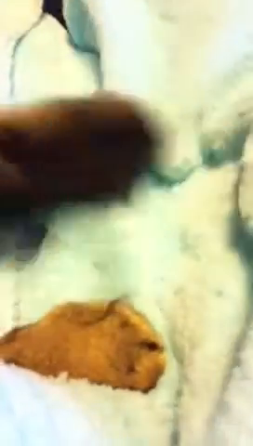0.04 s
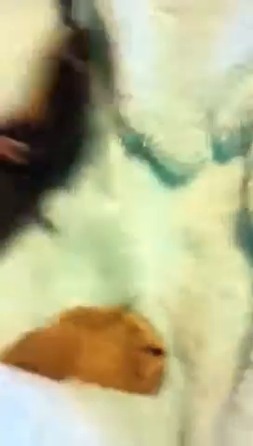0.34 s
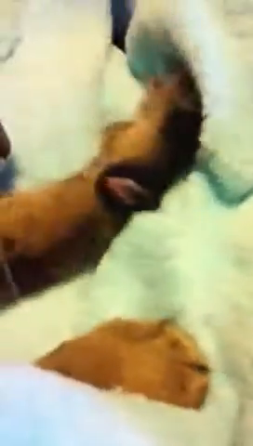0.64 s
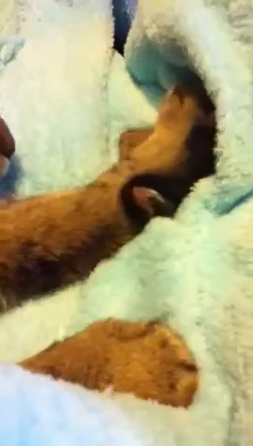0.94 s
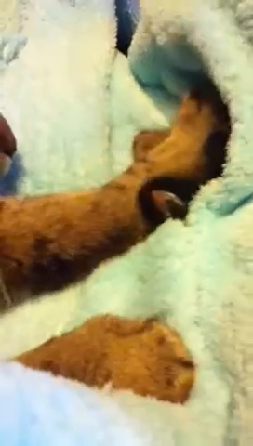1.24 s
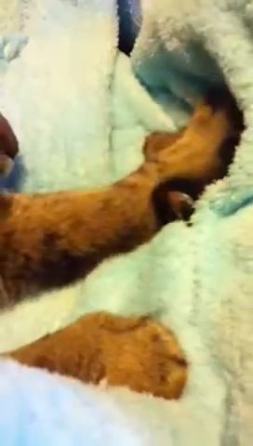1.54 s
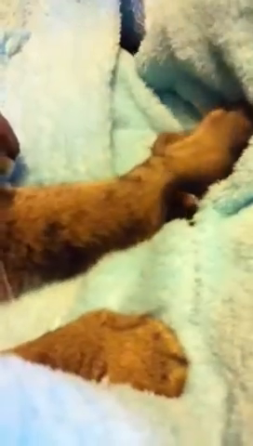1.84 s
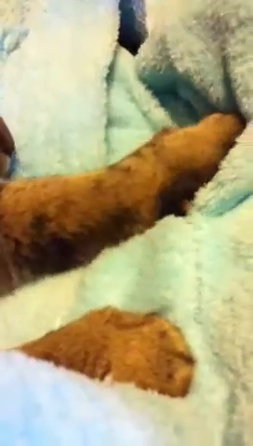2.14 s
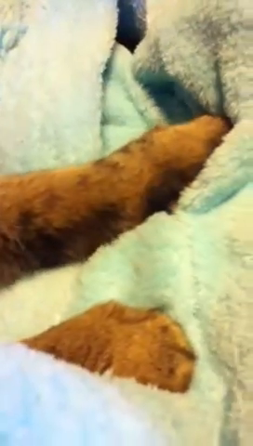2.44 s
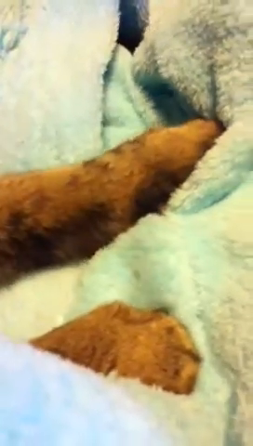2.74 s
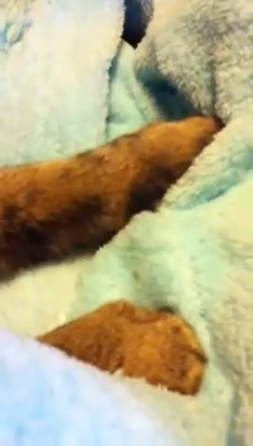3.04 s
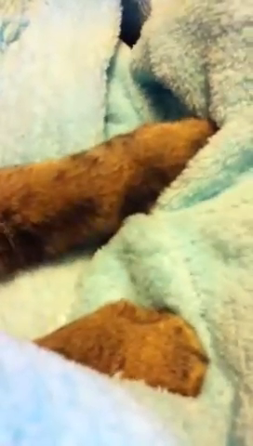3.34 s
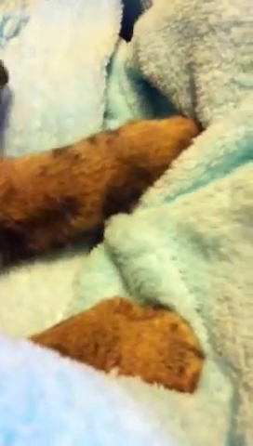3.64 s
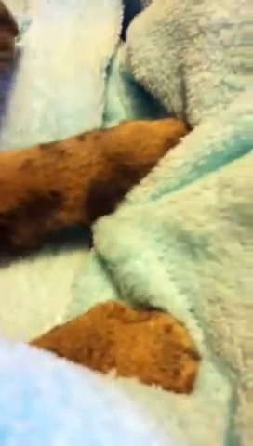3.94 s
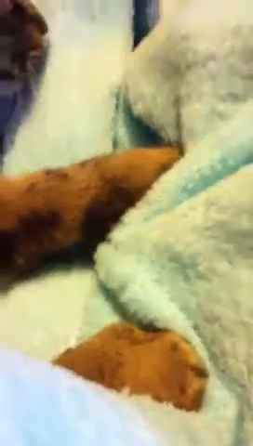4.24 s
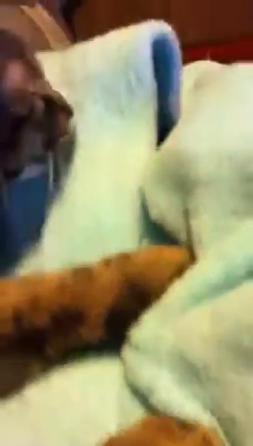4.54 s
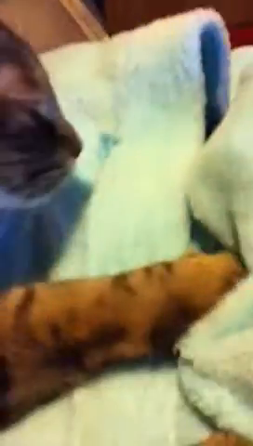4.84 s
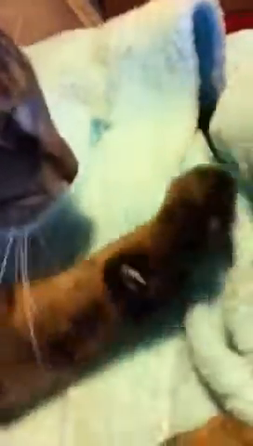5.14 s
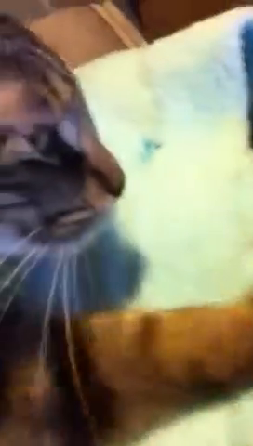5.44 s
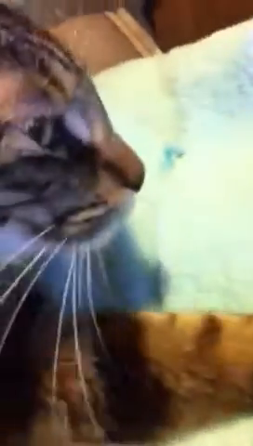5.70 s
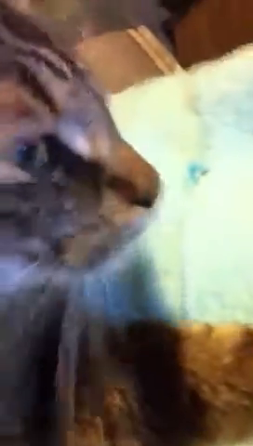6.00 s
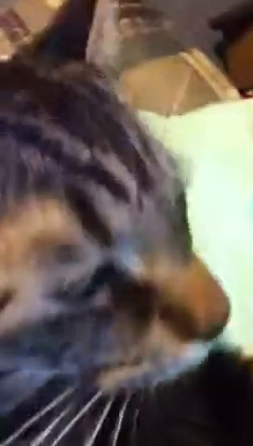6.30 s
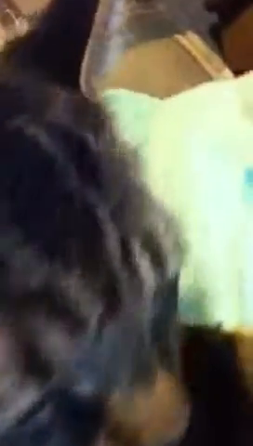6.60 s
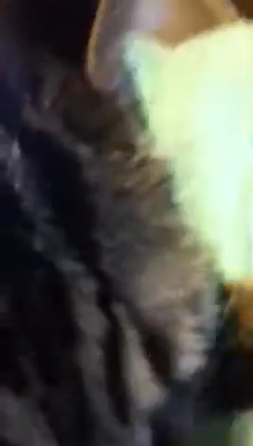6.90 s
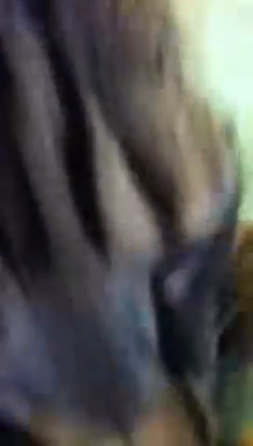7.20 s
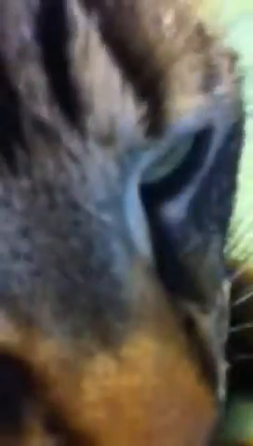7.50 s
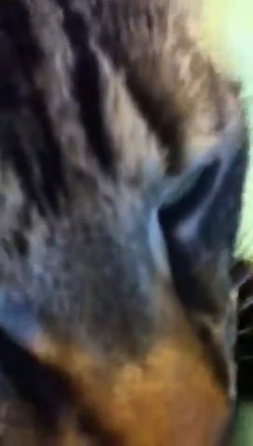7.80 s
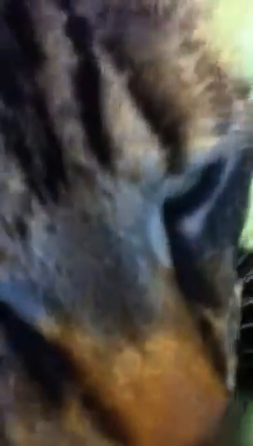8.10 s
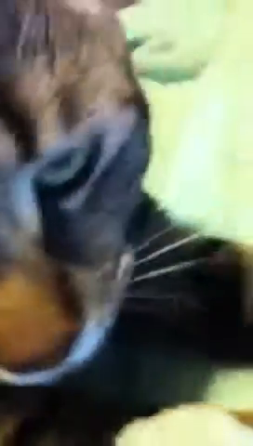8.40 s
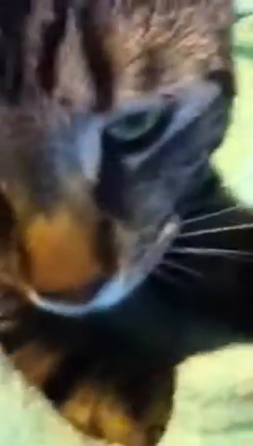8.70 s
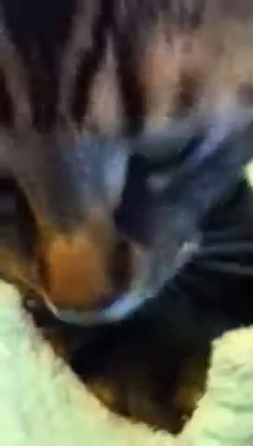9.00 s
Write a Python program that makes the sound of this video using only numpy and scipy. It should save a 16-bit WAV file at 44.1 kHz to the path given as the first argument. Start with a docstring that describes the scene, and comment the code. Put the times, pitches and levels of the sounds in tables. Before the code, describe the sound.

Indoors, a cat's close purr runs throughout in alternating outward and inward strokes, over a faint room hum and hiss. A short distant slide comes first, then tiny dry clicks, soft swishes of a fleece blanket, a gentle thump and faint squeaks. Later the purr grows deeper near the microphone while a cluster of wooden knocks, one loud, sounds further away. Two close clicks follow as the purring carries on.

```python
"""A cat kneads a fleece blanket close to the microphone, purring throughout: its larynx beats about 26
times a second, in outward strokes and inward ones that are sharper, lighter in the bass and rasp in the
nose. Early on, something slides across the room; then come fleece brushes, small clicks, a soft thump
close by near 5 s and faint squeaks. From 6 s the cat's head nears the microphone and the throb deepens;
furniture is bumped further off, loudly near 7 s. Two last clicks sound over the steady hum and hiss."""
import sys
import numpy as np
from scipy import signal
from scipy.fft import rfft, irfft, next_fast_len
from scipy.io import wavfile
from scipy.ndimage import uniform_filter1d

SR = 44100
rng = np.random.default_rng(int(sys.argv[2]) if len(sys.argv) > 2 else 0)


def transcribe(signal):
    """Save signal, clipped to [-1, 1], as a 16-bit WAV file at the path in sys.argv[1]."""
    frames = np.atleast_2d(signal).T
    limited = np.clip(frames, -1, 1)
    pcm = np.round(limited * 32767).astype(np.int16)
    wavfile.write(sys.argv[1], SR, pcm)


N = 403515


# The purr, close up, outward and inward in turn. Each row: first and last beat in seconds, relative level
# at mid-stroke in dB, swell across the stroke in dB, relative nose rasp in dB.
PURR_STROKES = [(.014, .611, -41.5, -5.5, -21), (.766, 1.259, -44, 1.5, -16),
                (1.342, 2.230, -43.5, -1.5, -40), (2.306, 2.535, -45, -2, -32),
                (2.572, 2.811, -44.5, -4, -36), (2.850, 3.076, -47, 4, -28), (3.113, 3.427, -45.5, -3, -32),
                (3.505, 3.614, -44, 4, -22), (3.686, 3.885, -40, 7, -34), (3.923, 4.037, -49, -8, -28),
                (4.076, 4.235, -38, -8, -24), (4.272, 4.420, -40.5, -1, -15.5),
                (4.459, 4.619, -44.5, -2, -23), (4.695, 4.992, -42.5, 4, -18.5),
                (5.033, 5.150, -45, 8, -28), (5.209, 5.245, -36.5, -7.5, -20), (5.271, 5.467, -45, -9, -30),
                (5.544, 5.881, -44.5, -10, -13), (5.921, 6.784, -44.5, 0.5, -22),
                (6.860, 7.276, -40, -2.5, -10.5), (7.323, 7.999, -40, -9, -23),
                (8.073, 8.488, -40, 1.5, -9), (8.569, 9.120, -41.5, 3.5, -17.5)]
# One beat through throat and chest, each way. Each row: frequency in Hz, relative level in dB.
OUTWARD_BODY = [(25, -45), (45, -16.5), (75, -6), (120, 5), (175, 5), (260, -5), (380, -2.5), (450, -14),
                (560, -26), (850, -25.5), (1400, -33.5), (4000, -55)]
INWARD_BODY = [(25, -54), (45, -32), (75, -9.5), (120, -3.5), (180, 5.5), (280, -6), (390, -1.5), (460, -9),
               (560, -21), (950, -18.5), (1500, -39.5), (4000, -54)]
# The head coming up to the microphone. Each row: time in seconds, nearness from 0 to 1.
HEAD_NEARNESS = [(6.0, 0.13), (7.4, 1)]

def cat(throb_db=-1.0, throb_hz=85):
    """Outward strokes beat in double kicks, inward ones are sharper; close up, the deepest throb swells."""
    outward = purr(PURR_STROKES[0::2], OUTWARD_BODY, rate_hz=25.1, voice_db=-2.0, flutter_db=-17,
                   lead_s=.0021, opening=.34, open_s=.002, rebound=.16, rebound_s=.017, rasp_s=.0062)
    inward = purr(PURR_STROKES[1::2], INWARD_BODY, rate_hz=26.6, voice_db=-2.3, flutter_db=-12,
                  lead_s=.0011, opening=.12, open_s=.00295, rebound=.28, rebound_s=.0145, rasp_s=.0042)
    voice = outward + inward
    nearness = np.interp(np.arange(N) / SR, *np.transpose(HEAD_NEARNESS))
    throb = filtered(voice, lambda hz: 1 / (1 + (hz / throb_hz) ** 4))
    return voice + amp(throb_db) * nearness * throb


# Air rasping in the nose, close up. Each row: frequency in Hz, relative level in dB.
NOSE_RASP = [(300, -28), (600, 9), (1000, 9), (1700, -4.5), (2500, -1.5), (3000, -8.5), (4000, -7),
             (4700, 0), (5600, -6), (6800, -2.5), (10000, -11), (15000, -31)]

def purr(strokes, body, rate_hz, voice_db, flutter_db, lead_s, opening, open_s, rebound, rebound_s, rasp_s):
    """Each beat is a soft opening, a sharp closure and a weak rebound, with a puff of turbulent air."""
    times, sizes, rasp = larynx_beats(strokes, rate_hz)
    closure = times - lead_s
    scatter = rng.standard_normal((len(times), 4)) * [.1, 1.2, .0006, 1.5]
    stretch, opening_db, late_s, rebound_db = scatter.T
    throat = ringing(body)
    voice = kicks(closure, sizes, throat)
    voice += kicks(closure - open_s * (1 + stretch), opening * sizes * amp(opening_db), throat)
    voice += kicks(closure + rebound_s + late_s, rebound * sizes * amp(rebound_db), throat)
    t = np.arange(SR // 10) / SR
    puff = np.exp(-t / .02) * (1 - np.exp(-t / .00066))
    flutter = kicks(closure, sizes, puff) * noise(body)
    # air ticks through the nose in a short jet at each closure
    jet = kicks(closure, sizes * rasp, np.exp(-t / rasp_s)) * noise(NOSE_RASP)
    return amp(voice_db) * voice + amp(flutter_db) * flutter + amp(6.5) * jet


def larynx_beats(strokes, rate_hz, jitter_s=.0003, scatter_db=1.0):
    """Time, size and rasp of every beat: a stroke gathers strength, swells or sags, and runs out of air."""
    runs = []
    for first, last, db, swell_db, rasp_db in strokes:
        t = np.linspace(first, last, round((last - first) * rate_hz) + 1)
        place = np.linspace(-.5, .5, len(t))
        attack_db = -7.5 * np.exp((first - t) / .031)
        release_db = -6.5 * np.exp((t - last) / .017)
        arch_db = 4 * (np.cos(np.pi * place) - 1)  # most rasp in mid-stroke, where the air is fastest
        runs.append([t, db + swell_db * place + attack_db + release_db, rasp_db + arch_db])
    times, effort_db, nose_db = np.concatenate(runs, axis=1)
    louder, later = rng.standard_normal((len(times), 2)).T
    return times + jitter_s * later, amp(effort_db + scatter_db * louder), amp(nose_db)


# A soft thump close by near 5 s, then bumps further off in the room. Each row: start in seconds, relative
# level in dB, rise in seconds, relative thud level in dB, treble corner of the clatter in Hz.
BUMP_HITS = [(4.966, -57.5, 0.0039, 5.5, 1200), (6.431, -57, 0.015, 3, 700), (6.525, -50, 0.011, -4, 5000),
             (6.594, -41, 0.0081, -8.5, 4200), (6.951, -21, 0.014, -15.5, 14000),
             (7.166, -30.5, 0.089, -4.5, 5200), (7.603, -38.5, 0.024, 5.5, 2500),
             (7.836, -60.5, 0.03, 13, 600)]
# The ringing wood. Each row: frequency in Hz, relative level in dB, seconds to fall by 60 dB.
WOOD_MODES = [(188, 5, 0.37), (241, 3.5, 0.24), (351.5, -6, 0.23), (395, -8, 0.34), (504, 3, 0.29),
              (581, -10, 0.4), (738, -11.5, 0.45), (856, -6.5, 0.36), (970, -8, 0.27), (1128, -5, 0.33),
              (1274, 0.5, 0.17), (1372, -8.5, 0.38), (1655, -9, 0.37), (1850, -11, .27)]
# A bump's low thud and bright knock. Each row: frequency in Hz, relative level in dB.
THUD_SPECTRUM = [(30, -38), (70, -2.5), (120, -3), (190, 4.5), (270, -16.5), (340, 5.5), (420, 1),
                 (480, -14.5), (580, -10.5), (900, -20.5), (3000, -43)]
KNOCK_SPECTRUM = [(70, -26), (150, -13), (230, 13.5), (350, 7), (530, -2), (650, -6), (1000, -1),
                  (1300, -1), (1800, -4.5), (2500, -9.5), (4000, -10), (7000, -13), (11000, -14),
                  (15500, -30)]

def bumps():
    """A soft thump, then knocks on wooden furniture: the thud comes first, the clatter builds after it."""
    out, t = np.zeros(N + SR), np.arange(SR) / SR
    for start, db, rise, thud_db, corner_hz in BUMP_HITS:
        chance = rng.standard_normal((len(WOOD_MODES), 2))
        ring = sum(amp(level + 2 * louder - 60 * t / t60) * np.sin(2 * np.pi * (hz * t + phase))
                   for (hz, level, t60), (louder, phase) in zip(WOOD_MODES, chance))
        thud = amp(thud_db + 3) * room_decay(noise(THUD_SPECTRUM, SR)) * (1 - np.exp(-t / (.5 * rise)))
        knock = room_decay(noise(KNOCK_SPECTRUM, SR))
        clatter = (amp(-1) * knock + amp(-9.5) * ring) * (1 - np.exp(-(t / rise) ** 2))
        # a softer contact loses its top
        clatter = filtered(
            clatter, lambda hz: 1 / (1 + 1j * hz / corner_hz * np.sqrt(2) - (hz / corner_hz) ** 2))
        out[round(start * SR):][:SR] += amp(db + 3.5) * (thud + clatter)
    return out[:N]


# A slide, well away from the microphone. Each row: frequency in Hz, relative level in dB.
SCUFF_SPECTRUM = [(120, -11), (260, -1.5), (600, 2), (950, -3), (1700, 2), (2800, -5.5), (4200, -9.5),
                  (8000, -20.5), (14000, -33.5)]

def scuff(start_s=.823, rise_s=.038, swell_s=.034):
    """Something slides briefly across the room and the walls carry it on."""
    t = np.arange(SR) / SR
    onset = (1 - np.exp(-t / rise_s)) * (1 + np.minimum(t / swell_s, 1))
    slide = room_decay(noise(SCUFF_SPECTRUM, SR)) * onset
    return amp(-36.5) * np.pad(slide, (round(start_s * SR), N))[:N]


# Paws and muzzle on the fleece, near the microphone. Each row: centre and half length in seconds,
# level in dB, strongest frequency in Hz.
FLEECE_BRUSHES = [(0.573, 0.055, -57.5, 2690), (2.0, .03, -62, 2600), (2.74, 0.021, -62, 2800),
                  (4.423, 0.082, -58.5, 2200), (5.54, 0.098, -60.5, 1470), (6.077, 0.18, -64.5, 1900),
                  (7.204, 0.07, -57.5, 6000), (8.293, 0.2, -59.5, 1620), (8.69, 0.081, -58, 2600)]
# Soft pushes against the bedding; the row at 6.995 s is the deep low end of the loud bump near 7 s. Each row:
# centre in seconds, level in dB.
BEDDING_PUSHES = [(2.72, -52), (4.98, -50), (6.49, -54), (6.64, -51), (6.995, -57), (7.65, -44)]

def blanket(band_q=.94, push_s=.028):
    """The fleece swishes under the paws and gives dull pushes when weight shifts; one more dull push deepens
    the loud bump near 7 s."""
    t = np.arange(N) / SR
    fibres = amp(1.1 * unit(uniform_filter1d(rng.standard_normal(N), size=90)))
    swish = np.zeros(N)
    for centre, half, db, peak_hz in FLEECE_BRUSHES:
        friction = fibres * rng.standard_normal(N)
        rub = filtered(friction, lambda hz: hz / (hz + 1j * band_q * (hz * hz / peak_hz - peak_hz)))
        swish += amp(db) * np.exp(-((t - centre) / half) ** 2) * unit(rub)
    weight = sum(amp(db) * np.exp(-((t - centre) / push_s) ** 2) for centre, db in BEDDING_PUSHES)
    rumble = noise([(15, -10), (35, -10), (65, 8), (110, 3), (300, -36), (1000, -70)])
    return swish + weight * rumble


# Clicks right by the microphone. Each row: start in seconds, peak level in dB.
NEAR_CLICKS = [(1.56, -35), (4.982, -34), (5.207, -41), (8.644, -36), (8.705, -26.5)]

def clicks():
    """Tiny dry contacts, each ringing with the same short tick."""
    tick = ringing([(60, 3), (300, -12), (900, 8.5), (2200, -3), (3900, -11), (4650, .5), (5400, -11),
                    (7000, -6), (10000, -21), (15000, -23)])
    times, db = np.transpose(NEAR_CLICKS)
    return kicks(times, amp(db), tick / np.abs(tick).max())


# Faint squeaks as the cat shifts. Each row: centre and half length in seconds, relative level in dB,
# pitch in Hz, glide in Hz a second.
RUB_SQUEAKS = [(5.35, .025, -60, 3750, 496), (5.468, .016, -58, 1016, 4000)]

def squeaks(width_hz=260):
    """Short, thin rubbing tones: narrow noise around a gliding pitch."""
    t = np.arange(N) / SR
    grain = unit(filtered(rng.standard_normal(N), lambda hz: np.exp(-(hz / width_hz) ** 2)))
    tones = np.zeros(N)
    for centre, half, db, hz, glide in RUB_SQUEAKS:
        phase = 2 * np.pi * np.cumsum(hz + glide * (t - centre)) / SR
        tones += amp(db) * np.exp(-((t - centre) / half) ** 2) * np.sin(phase)
    return grain * tones


# The room's echo. Each row: frequency in Hz, seconds to fall by 60 dB.
ROOM_T60 = [(100, 0.51), (200, 0.49), (400, 0.34), (560, 0.42), (1500, 0.39), (5000, 0.28), (12000, 0.2)]

def room_decay(x):
    """Each frequency dies away as it does in the room, the treble soonest."""
    hz, t, spectra = signal.stft(x, SR, nperseg=256)
    fade = amp(-60 * t / along(ROOM_T60, hz)[:, None])
    return signal.istft(spectra * fade, SR, nperseg=256)[1][:len(x)]


# The quiet room at the microphone. Each row: frequency in Hz, relative level in dB.
ROOM_TONE = [(15, -55), (25, -19.5), (59, -10), (119, -3), (178, 0), (246, -9), (389, -10.5), (632, -19),
             (1030, -17.5), (1460, -22.5), (2490, -25), (8380, -27.5), (11900, -29.5), (15600, -33.5)]

def room_tone():
    """Steady room hum and microphone hiss."""
    return amp(-53.5) * noise(ROOM_TONE)


def amp(db):
    """Decibels to gain."""
    return 10 ** (np.asarray(db) / 20)


def unit(x):
    """Scale to rms 1."""
    return x / np.sqrt(np.mean(x ** 2) + 1e-20)


def along(points, hz):
    """Read (Hz, value) points on a log frequency axis."""
    point_hz, values = np.transpose(points)
    return np.interp(np.log(hz + 1), np.log(point_hz + 1), values)


def filtered(x, response):
    """Filter x by a gain given as a function of Hz."""
    size = next_fast_len(len(x) + SR // 2)
    return irfft(rfft(x, size) * response(np.fft.rfftfreq(size, 1 / SR)), size)[:len(x)]


def noise(spectrum, size=N):
    """Noise of rms 1, coloured by (Hz, dB) points."""
    return unit(filtered(rng.standard_normal(size), lambda hz: amp(along(spectrum, hz))))


def ringing(spectrum, size=8192):
    """A body's answer to one kick, from (Hz, dB) points, with the energy of 10 ms at rms 1."""
    cepstrum = irfft(np.log(amp(along(spectrum, np.fft.rfftfreq(size, 1 / SR)))))
    # minimum phase: nothing sounds before the kick
    cepstrum[1:size // 2] *= 2
    cepstrum[size // 2 + 1:] = 0
    answer = irfft(np.exp(rfft(cepstrum)))[:size // 2]
    return answer * np.sqrt(SR / 100) / np.linalg.norm(answer)


def kicks(times, sizes, answer):
    """A scaled copy of the answer at each time."""
    at = np.clip(np.round(times * SR).astype(int), 0, N)
    return signal.fftconvolve(np.bincount(at, sizes, N + 1), answer)[:N]


def scene():
    """One microphone by the blanket: the cat in front, the room behind."""
    return (cat() + bumps() + scuff() + blanket() + squeaks() + clicks() + room_tone())[None]


def record(dry):
    """The recorder keeps nothing above 15750 Hz."""
    return np.array([filtered(channel, lambda hz: hz < 15750) for channel in dry])


dry = scene()
out = record(dry)
transcribe(out)
```